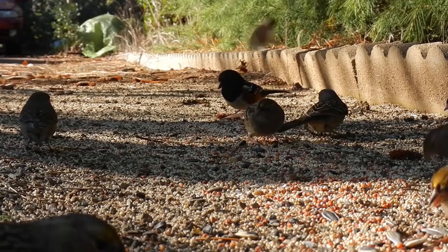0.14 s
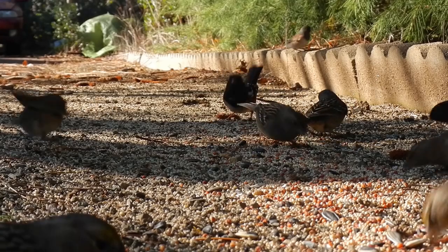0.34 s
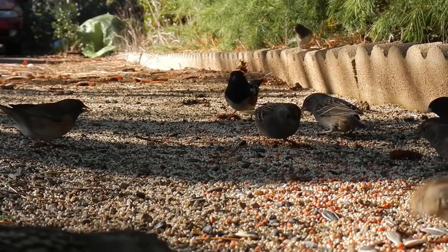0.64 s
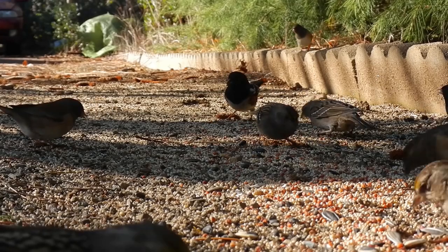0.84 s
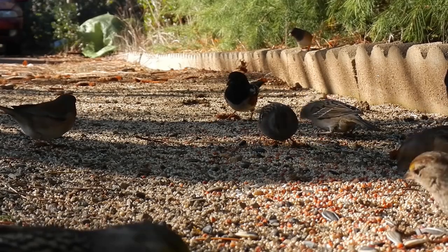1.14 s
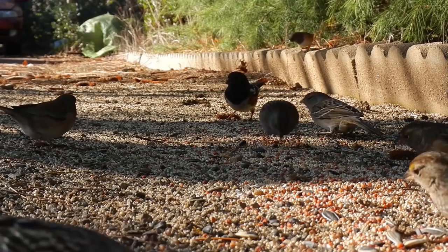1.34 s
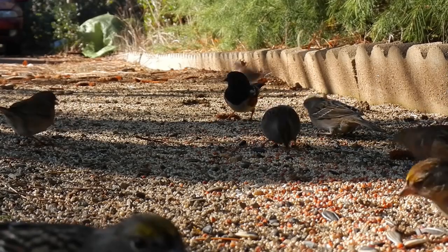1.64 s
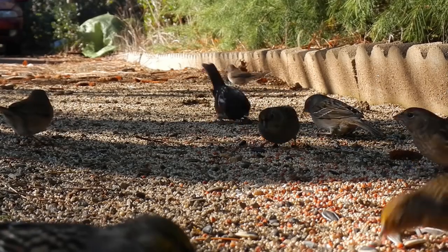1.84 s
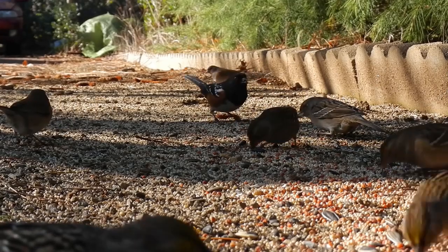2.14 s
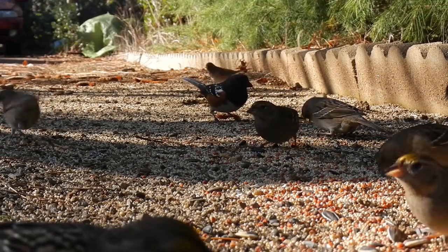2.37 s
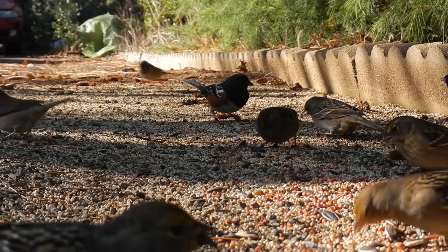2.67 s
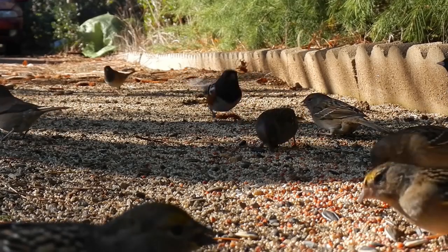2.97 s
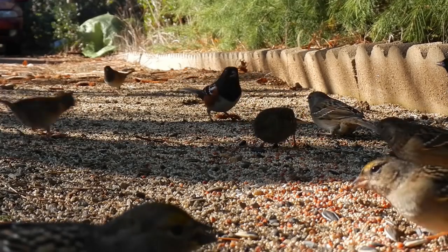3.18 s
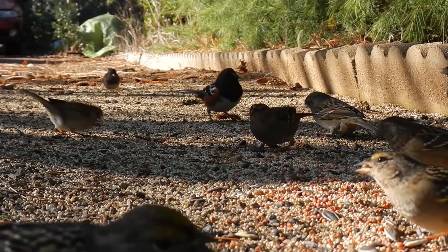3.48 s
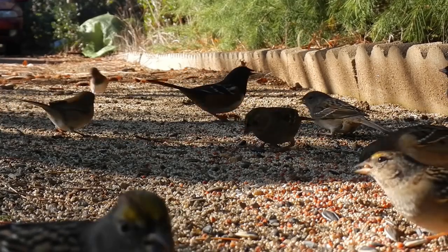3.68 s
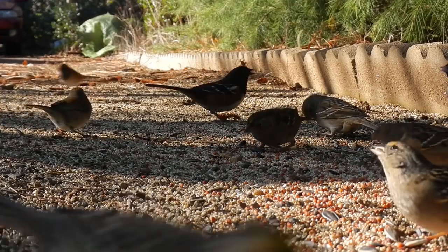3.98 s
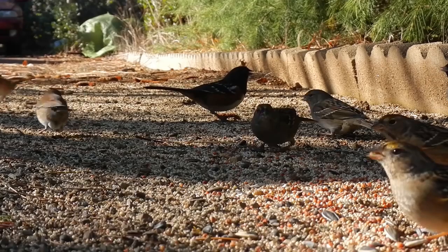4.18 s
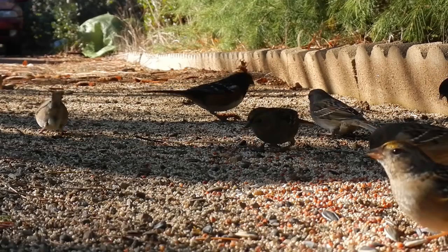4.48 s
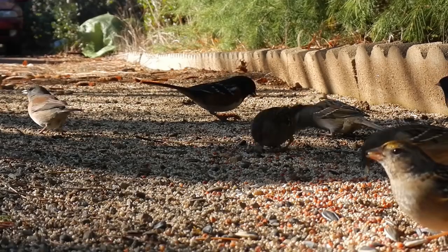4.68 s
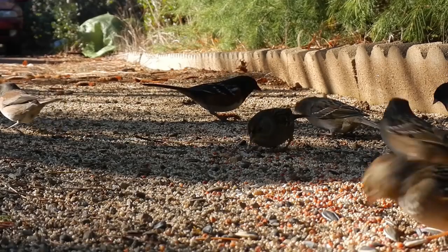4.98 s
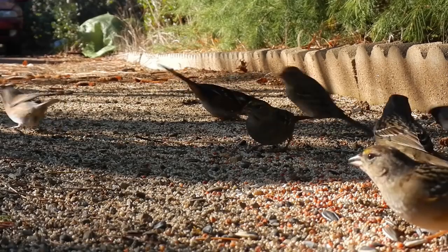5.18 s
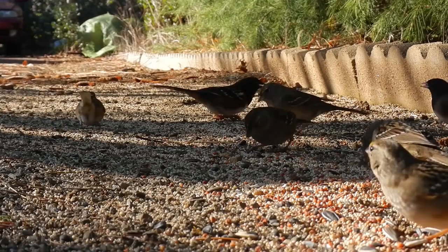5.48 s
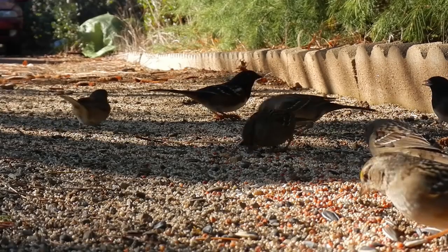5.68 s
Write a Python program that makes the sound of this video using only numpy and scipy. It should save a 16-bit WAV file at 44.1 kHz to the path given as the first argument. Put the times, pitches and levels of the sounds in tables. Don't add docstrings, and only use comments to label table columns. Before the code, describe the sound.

Outdoors, a quick string of falling sparrow chips opens while beaks tap the gritty ground in dry uneven clicks. Thin rising calls come sparsely. Around four seconds taps and seed nips crowd together with a near bird's scratchy hop and drag, then only light foot patter remains. Faint hiss, a very high whine and slowly swelling distant traffic lie beneath; the close stereo microphones have no bass.

```python
import sys
import numpy as np
from scipy import signal
from scipy.fft import rfft, irfft, next_fast_len
from scipy.io import wavfile
from scipy.ndimage import map_coordinates

SR = 44100
rng = np.random.default_rng(int(sys.argv[2]) if len(sys.argv) > 2 else 0)


def convert_level_to_amplitude(level_db):
    exponent = np.asarray(level_db, float) / 20
    return 10 ** exponent


def digitize_waveform(pressure):
    field = np.atleast_2d(pressure).T
    bounded = np.clip(field, -1, 1)
    quanta = np.round(bounded * 32767).astype(np.int16)
    wavfile.write(sys.argv[1], SR, quanta)


N = 256662

# (time [s], peak level [dB], pitch [Hz], grit tick over it [dB], husk crack over it [dB])
KNOCKS = [(0.411, -34, 3340, -9, -6.5), (0.646, -24, 2570, 0, -23), (0.6587, -37, 2310, -2.2, -10.5),
          (1.369, -43, 3000, -4, -14), (1.4095, -30.5, 2400, -11, -19), (1.4702, -35.5, 2880, -3, -23),
          (1.5578, -42, 2720, -9, -12), (1.648, -48, 2370, -15, -19), (1.9766, -27.5, 2670, -13.5, -29),
          (2.466, -31, 2700, -3.5, -32), (3.2081, -42.5, 2380, -4, -5), (3.2821, -35, 2620, -4.5, -26),
          (3.333, -44, 3330, -7, -7), (3.4047, -31, 2600, -9.5, -13), (3.8251, -23, 2620, -3.5, -9.5),
          (3.8467, -36, 2430, -10, -22), (3.9732, -37.5, 2510, -5, -1), (4.122, -34.5, 3000, 0, -9)]
# (time [s], grit tick level [dB], husk crack over it [dB], left-right [dB])
NIPS = [(0.1872, -49, -6, -4.5), (0.2952, -46, -6, 0), (0.564, -36.5, -8, -4.5), (0.582, -31.5, -10, 0),
        (1.329, -52, 5, 4), (1.3352, -38, -14, -4), (1.3407, -36.5, 2, 5), (1.3649, -47, -11, -2),
        (1.6304, -34.5, -18.5, -3), (2.3076, -45.5, -16, 0), (2.33, -46.5, -19, -2.1),
        (2.485, -50.5, -2, 1), (3.6905, -42, -7, 8.5), (3.9491, -33.5, -23, .4), (4.0982, -35, -17, -4),
        (4.1323, -27, -10, -5), (4.14, -40, -3, 5), (4.228, -36, -18, -.1), (4.235, -38, -3, -2),
        (4.2523, -37.5, -17, 1), (4.2908, -55, 15, 0), (4.3483, -45, -22, -3), (4.3633, -38, -12, 1),
        (4.3844, -43, -1.5, 1.1), (4.423, -42, -17.5, .4), (4.5128, -43, -9.4, -5), (5.7229, -33.5, -9, -9)]


def contacts():
    knock_pan_db = -1.2
    nip_thud_db, nip_thud_hz = -12, 2600
    knocks = [(s, db, hz, db + husk, db + grit, knock_pan_db) for s, db, hz, grit, husk in KNOCKS]
    nips = [(s, db + max(husk, 0) + nip_thud_db, nip_thud_hz, db + husk, db, pan)
            for s, db, husk, pan in NIPS]
    return sorted(knocks + nips)


def ring(t, hz, life_s, phase_cycles):
    envelope = (t / life_s) ** 2 * np.exp(2 - 2 * t / life_s)
    return envelope * np.sin(2 * np.pi * (hz * t + phase_cycles))


# (frequency [Hz], level [dB])
GRIT_MODES = [(8700, -10), (10200, 3), (11200, -3), (13000, -8), (14100, 0.3), (15100, 2.5)]


def strike(t, knock_db, knock_hz, husk_db, grit_db):
    chance = rng.random((11, 3))
    spray = np.diff(rng.standard_normal((2, len(t) + 1)))
    knock = ring(t, knock_hz, 0.00056, 0)
    knock = knock + 0.41 * ring(t, 0.74 * knock_hz, 0.00056, 0.2)
    knock = knock + 0.27 * ring(t, 1.313 * knock_hz, 0.00074, -0.23)
    husk = 0
    for hz, c in zip((5200, 6300, 7100), chance):
        husk = husk + ring(t, hz * (0.93 + 0.15 * c[0]), 0.00038, c[0] + 0.32 * c[1:, None])
    grit = 0
    for (hz, db), c in zip(GRIT_MODES, chance[3:]):
        stone = ring(t, hz * (0.97 + 0.036 * c[0]), 0.00045, c[0] + 0.11 * c[1:, None])
        grit = grit + convert_level_to_amplitude(db) * stone
    hit = convert_level_to_amplitude(knock_db - 2.0) * knock + convert_level_to_amplitude(husk_db - 2.0) * husk + convert_level_to_amplitude(grit_db - 5.5) * grit
    rebound = round((0.0017 + 0.00045 * chance[10, 0]) * SR)
    hit = hit + convert_level_to_amplitude(-10.0) * np.roll(hit, rebound, axis=1) + convert_level_to_amplitude(-18.5) * np.roll(hit, 2 * rebound, axis=1)
    return hit + convert_level_to_amplitude(grit_db - 19.0 - 60 * t / 0.047) * spray


def pecks():
    out, t = np.zeros((2, N + SR)), np.arange(SR // 25) / SR
    for s, knock_db, knock_hz, husk_db, grit_db, pan_db in contacts():
        hit = strike(t, knock_db, knock_hz, husk_db, grit_db)
        start = round((s - 0.0006) * SR)
        out[:, start:start + len(t)] += sides(pan_db) * hit
    return out[:, :N]


def chip(s, length, first_hz, last_hz, db):
    peak = 0.65
    peak_hz = first_hz + peak * (last_hz - first_hz)
    return [(s, first_hz, db - 8), (s + peak * length, peak_hz, db), (s + length, last_hz, db - 2)]


def seep(s, length, first_hz, top_hz, db):
    rise_hz_s, fade_db_s, flick_s = 48000, 129.5, 0.005
    span_hz, held = top_hz - first_hz, length - flick_s
    rise = min(span_hz / rise_hz_s, 0.9 * held)
    end_db = db - fade_db_s * (held - rise / 2)
    return [(s, first_hz, db - 4),
            (s + rise / 2, (first_hz + top_hz) / 2, db),
            (s + rise, top_hz, db - fade_db_s * rise / 2),
            (s + held, top_hz, end_db),
            (s + length, top_hz - 0.7 * span_hz, end_db)]


def whistle(glides, rough):
    out, t = np.zeros(N), np.arange(N) / SR
    unsteady, flutter_db = 1 + rough * wobble(600), 1.2 * wobble(250)
    for glide in glides:
        s, hz, db = np.transpose(glide)
        on = slice(max(round(s[0] * SR), 0), round(s[-1] * SR))
        ends = np.clip(np.minimum(t[on] - s[0], s[-1] - t[on]) / 0.004, 0, 1)
        cycles = np.cumsum(np.interp(t[on], s, hz) * unsteady[on]) / SR
        level = convert_level_to_amplitude(np.interp(t[on], s, db) + flutter_db[on])
        out[on] += np.sqrt(2) * ends * level * np.sin(2 * np.pi * cycles)
    return out


def yard(x, pan_db, lag_s, wet_db, t60):
    t = np.arange(SR // 3) / SR
    tail = rng.standard_normal((2, len(t))) * convert_level_to_amplitude(-60 * t / t60) * (1 - np.exp(-t / 0.015))
    echo = signal.fftconvolve(x[None], tail / np.linalg.norm(tail[0]), axes=1)[:, :N]
    direct = filtered(x, lambda hz: np.exp(np.array([[-1j], [1j]]) * np.pi * hz * lag_s))
    return sides(pan_db) * direct + convert_level_to_amplitude(wet_db) * echo


# (time [s], length [s], first frequency [Hz], last frequency [Hz], level [dB])
CHIPS = [(.002, 0.042, 5980, 4020, -51), (.135, 0.047, 6200, 3580, -48.5), (.256, 0.033, 5930, 5820, -50.5),
         (0.284, .025, 5750, 3710, -46.5), (0.364, 0.019, 7300, 6200, -59), (0.386, 0.022, 6010, 5900, -48),
         (0.404, .02, 5750, 4130, -48.5), (0.487, 0.036, 7250, 5970, -53.5), (0.515, .035, 5990, 4050, -50),
         (.62, 0.057, 6290, 3780, -51.5), (3.844, .044, 6340, 4300, -50), (3.973, 0.026, 6100, 6050, -54)]
# (time [s], length [s], first frequency [Hz], top frequency [Hz], level [dB])
SEEPS = [(.23, .034, 6680, 7320, -58.5), (0.551, 0.026, 6600, 7370, -56.5), (0.593, .078, 6260, 6530, -58),
         (0.902, .037, 6480, 7220, -60.5), (1.095, 0.047, 6300, 7760, -51), (2.03, 0.028, 7170, 8180, -65),
         (2.705, .02, 6500, 7250, -64), (3.042, 0.021, 6100, 6350, -56), (4.068, .022, 6500, 7140, -60),
         (4.49, 0.086, 6260, 6900, -65), (4.748, .031, 5270, 6730, -66)]
# (time [s], frequency [Hz], level [dB])
BUZZ = [
    (4.722, 9660, -57),
    (4.745, 9250, -53.5),
    (4.77, 9650, -60.5),
    (4.8, 9200, -66),
]


def calls():
    chips = whistle([chip(*row) for row in CHIPS], rough=0.01)
    seeps = whistle([seep(*row) for row in SEEPS], rough=0.0062)
    buzz = whistle([BUZZ], rough=0.061)
    return (yard(chips, pan_db=0.7, lag_s=0.00003, wet_db=-4, t60=0.35)
            + yard(seeps, pan_db=1.0, lag_s=-0.000027, wet_db=-5.5, t60=0.086)
            + yard(buzz, pan_db=-5.5, lag_s=0.00001, wet_db=-1.5, t60=0.081))


# (time [s], hold [s], bright scuff level [dB], dull scuff over it [dB])
SCRAPES = [
    (4.026, .03, -63, 6.5),
    (4.113, 0.025, -38, 0.75),
    (4.15, .07, -50, 0),
    (4.224, .034, -45, -2),
    (4.27, 0.037, -55.5, -1.5),
]
# (frequency [Hz], level per Hz [dB])
BRIGHT = [(5000, -22), (8500, -13.5), (10700, 0.5), (12300, -4), (13500, -1), (16000, -8.5)]
# (frequency [Hz], level per Hz [dB])
DULL = [(1300, -1), (2500, -2), (5000, 2), (7000, 2), (9000, -17.5), (12000, -30)]


def scuffs():
    s, hold, db, under_db = np.transpose(SCRAPES)
    bright_db = strokes(s, hold, db, rise_db_s=751, fall_db_s=520)
    dull_db = strokes(s, hold, db + under_db, rise_db_s=751, fall_db_s=520)
    bright = convert_level_to_amplitude(bright_db + 2.0 + 1.9 * wobble(40)) * rush(BRIGHT, alike=0.32, grain_db=2.5)
    dull = convert_level_to_amplitude(dull_db - 2.0 + 1.2 * wobble(70)) * rush(DULL, alike=0.7, grain_db=2.5)
    return bright + dull


# (time [s], hold [s], level [dB])
STEPS = [(0.002, .005, -59.5), (0.412, .01, -66), (0.577, 0.025, -59.5), (0.976, .06, -66.5),
         (1.36, .02, -56.5), (1.6, .04, -63.5), (1.9, .05, -64.5), (2.024, .02, -59.5), (2.149, .17, -64.5),
         (2.549, .1, -69), (2.879, .03, -61), (2.981, .1, -63), (3.204, .01, -64.5), (3.406, 0.011, -61),
         (3.52, .07, -63.5), (3.701, .01, -62), (3.944, 0.035, -55), (4.062, .24, -62.5),
         (4.327, 0.089, -55.5), (4.52, .01, -58.5), (4.74, 0.12, -61), (4.929, .2, -60), (5.2, .18, -57.5),
         (5.55, 0.11, -62), (5.742, .02, -59.5)]
# (frequency [Hz], level per Hz [dB])
PATTER = [(3000, -20), (6000, -11), (8500, -10), (10700, 0), (12300, -6), (13500, -3.5), (16000, -6.5)]


def footsteps():
    still_db = -74
    feet_db = np.maximum(strokes(*np.transpose(STEPS), rise_db_s=110.5, fall_db_s=120), still_db)
    return convert_level_to_amplitude(feet_db + 1.5 + 1.5 * wobble(25)) * rush(PATTER, alike=0.74, grain_db=1.5)


# (time [s], level [dB])
TRAFFIC = [
    (0.0, -56),
    (0.7, -57.5),
    (1.38, -57.5),
    (1.8, -58.5),
    (2.12, -57.5),
    (2.48, -58),
    (3.68, -55),
    (4.08, -54),
    (4.31, -51),
    (5.82, -49.5),
]
# (frequency [Hz], level per Hz [dB])
ROAD = [(1000, -1), (1500, 1.5), (2000, -1.5), (2800, -10.5), (4000, -15), (6000, -26)]


def traffic():
    s, db = np.transpose(TRAFFIC)
    road_db = np.interp(np.arange(N) / SR, s, db)
    return convert_level_to_amplitude(road_db + 3.0 + 0.75 * wobble(9.6)) * rush(ROAD, alike=0.75, grain_db=0.3)


# (frequency [Hz], level per Hz [dB])
HISS = [(1000, -1.5), (2500, -0.5), (4000, -4), (6000, -5.5), (8500, -10), (10500, -9), (12500, -12.5),
        (15500, -13.5)]
# (gap start [Hz], gap end [Hz], upper
# limit [Hz])
SILENT_GAP = (14290, 14690, 15750)


def background():
    hiss = convert_level_to_amplitude(-55 + 1.3 * wobble(1.2)) * rush(HISS, alike=0.26, grain_db=1.2)
    gap_start, gap_end, limit = SILENT_GAP
    return filtered(traffic() + footsteps() + hiss,
                    lambda hz: (hz < gap_start) | (hz > gap_end) & (hz < limit))


# (frequency [Hz], level [dB])
WHINE = [(14836, -59)]


def whine():
    (hz, db), t = WHINE[0], np.arange(N) / SR
    phase = np.array([[0], [-0.3]])
    drift_db = 0.9 * wobble(14)
    return sides(-8.0) * convert_level_to_amplitude(db + 3.0 + drift_db) * np.sin(2 * np.pi * hz * t + phase)


def unit(x):
    return x / np.sqrt(np.mean(x ** 2) + 1e-20)


def along(points, hz):
    f, v = np.transpose(points)
    return np.interp(np.log(hz + 1), np.log(f + 1), v)


def wobble(rate):
    knots = rng.standard_normal(int(N * rate / SR) + 4)
    return map_coordinates(knots, [np.arange(N) * rate / SR])


def filtered(x, response):
    m = next_fast_len(N + 8192)
    return irfft(rfft(x, m) * response(np.fft.rfftfreq(m, 1 / SR)), m)[..., :N]


def sides(pan_db):
    return convert_level_to_amplitude(np.array([[0.5], [-0.5]]) * pan_db)


def rush(spectrum, alike, grain_db):
    a, b = rng.standard_normal((2, N)) * convert_level_to_amplitude(grain_db * wobble(700))
    turn = np.arccos(np.clip(alike, 0, 1)) / 2
    middle, side = np.cos(turn) * a, np.sin(turn) * b
    pair = np.array([middle + side, middle - side])
    return unit(filtered(pair, lambda hz: convert_level_to_amplitude(along(spectrum, hz))))


def strokes(starts, holds, levels_db, rise_db_s, fall_db_s):
    t = np.arange(N) / SR
    return np.max([db - rise_db_s * np.maximum(s - t, 0) - fall_db_s * np.maximum(t - s - hold, 0)
                   for s, hold, db in zip(starts, holds, levels_db)], axis=0)


def causal(points):
    hz = np.fft.rfftfreq(4096, 1 / SR)
    cepstrum = irfft(np.log(convert_level_to_amplitude(along(points, hz))))
    cepstrum[1:len(hz) - 1] *= 2
    cepstrum[len(hz):] = 0
    return irfft(np.exp(rfft(cepstrum)))


def scene():
    return pecks() + calls() + scuffs() + background()


def band_limit(x):
    return signal.sosfilt(signal.butter(12, 16820, fs=SR, output="sos"), x)


# (frequency [Hz], level [dB])
BASS_CUT = [(500, -80.5), (760, -62), (840, -36), (1000, -26.5), (1300, -16.5), (1600, -3.5), (1900, 2),
            (15700, 2), (16100, -26), (17000, -60.5)]
# (frequency [Hz], left-right [dB])
LEAN = [(1000, 2.5), (2400, 2), (4400, 1.44), (8000, -1), (14000, -1.5)]
# (frequency [Hz], phase [radians])
TRAIL = [(1600, 0.11), (3300, 0.51), (7000, 1.1), (9600, 2.5), (11600, 0.71), (14000, 0.77)]


def record(dry):
    def pair(hz):
        late = np.exp(np.array([[-1j], [1j]]) * along(TRAIL, hz) / 2)
        return sides(along(LEAN, hz)) * late

    cut = signal.fftconvolve(dry, causal(BASS_CUT)[None], axes=1)[:, :N]
    mic = filtered(cut, pair)
    rumble = filtered(rng.standard_normal(N), lambda hz: convert_level_to_amplitude(-88) * (hz < 1500))
    circuit = rumble * np.array([[1], [-1]])
    return band_limit(mic + whine() + circuit)


dry = scene()
out = record(dry)
digitize_waveform(out)
```